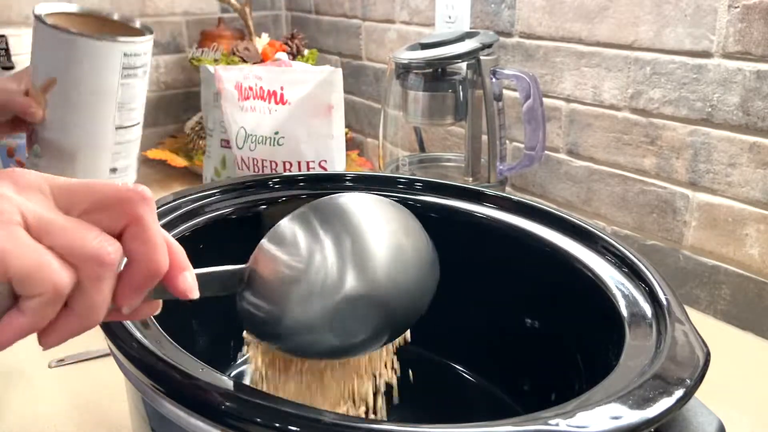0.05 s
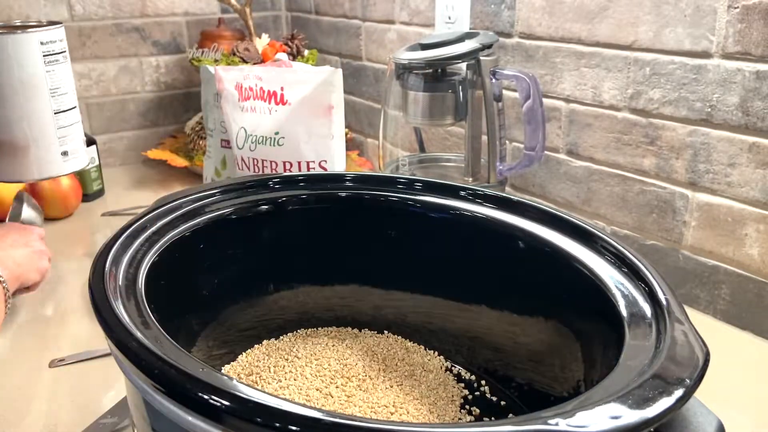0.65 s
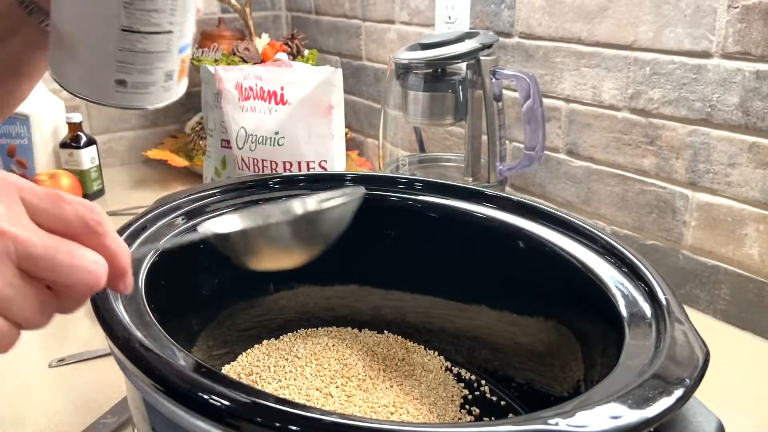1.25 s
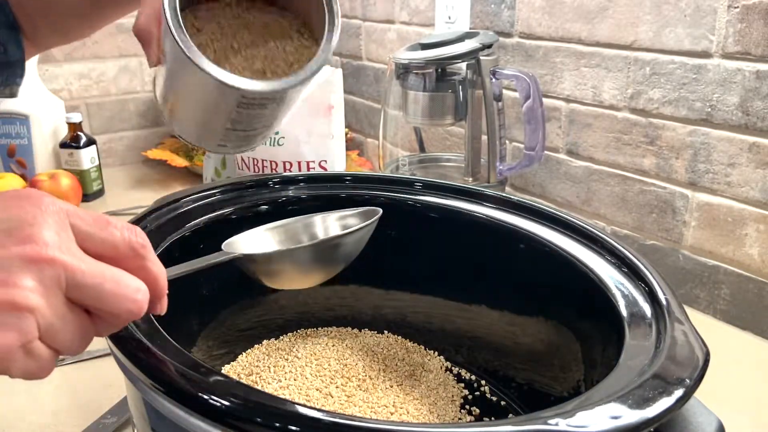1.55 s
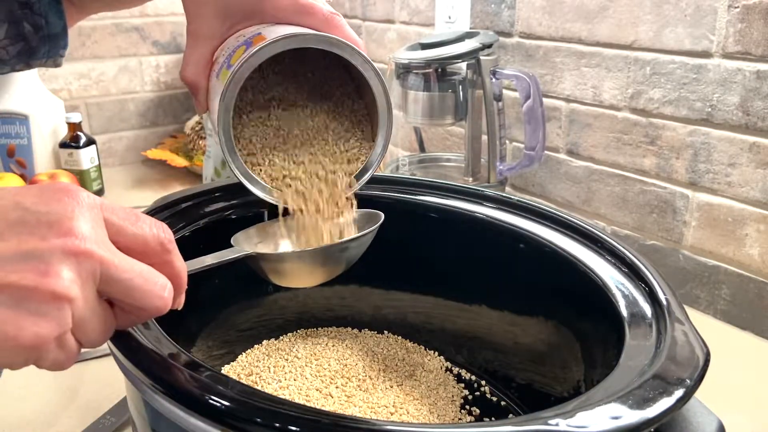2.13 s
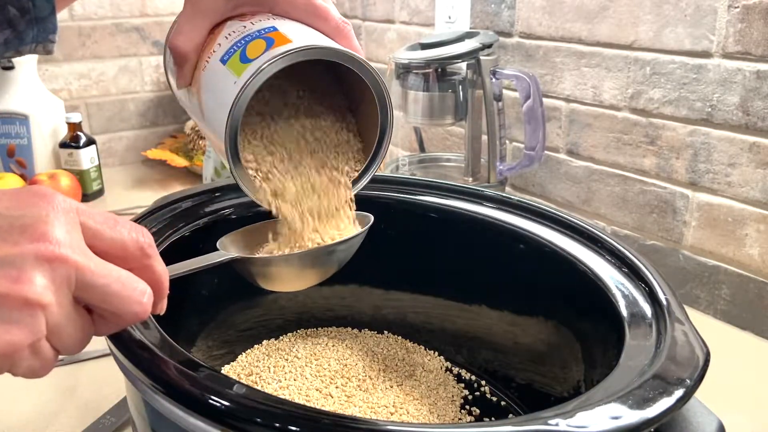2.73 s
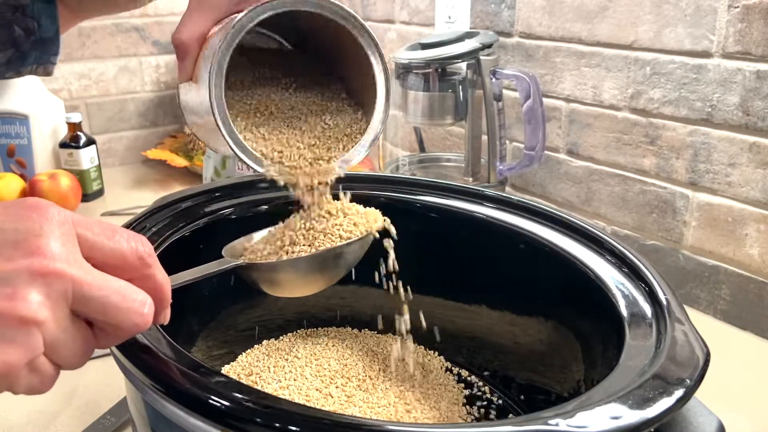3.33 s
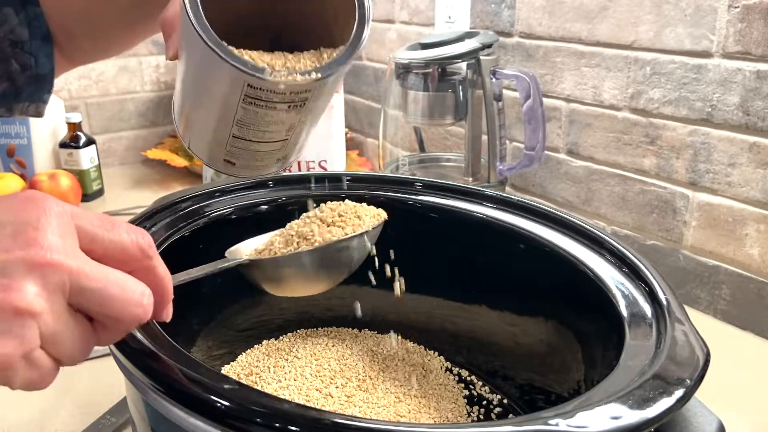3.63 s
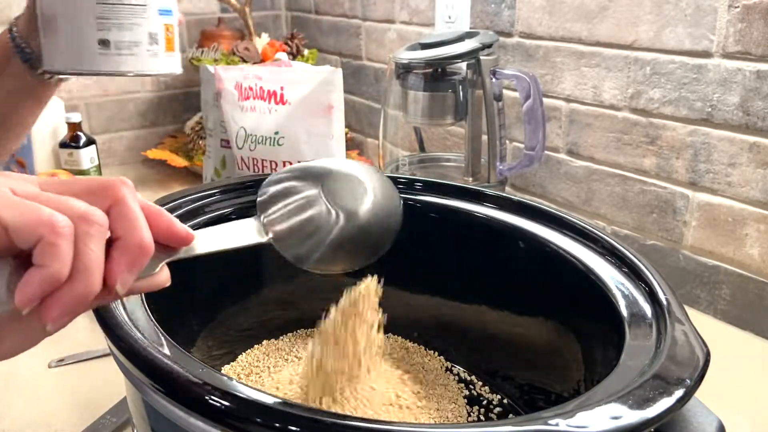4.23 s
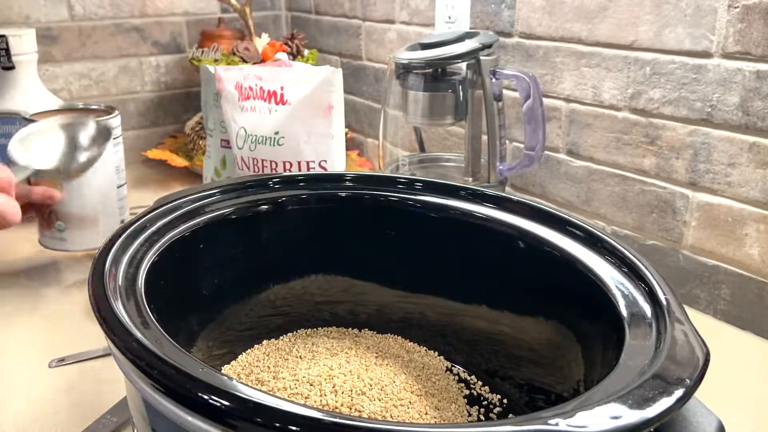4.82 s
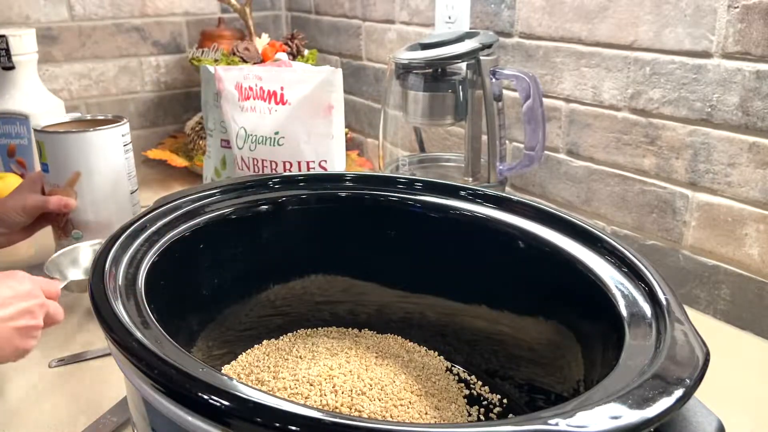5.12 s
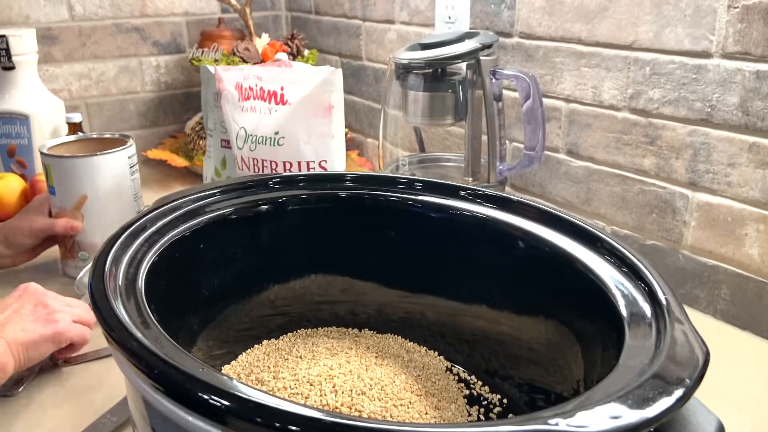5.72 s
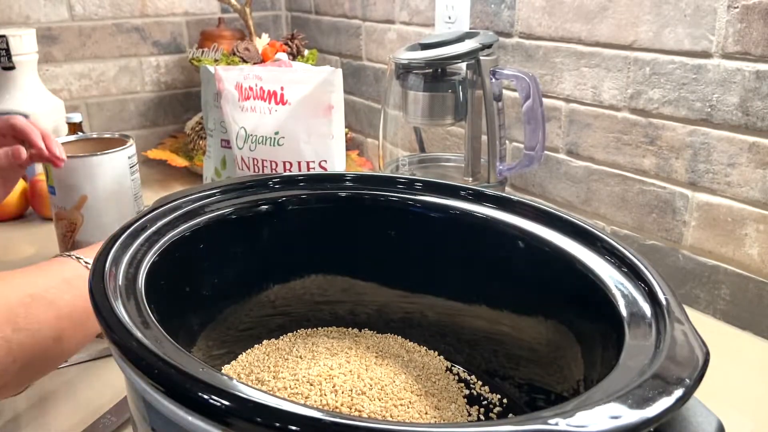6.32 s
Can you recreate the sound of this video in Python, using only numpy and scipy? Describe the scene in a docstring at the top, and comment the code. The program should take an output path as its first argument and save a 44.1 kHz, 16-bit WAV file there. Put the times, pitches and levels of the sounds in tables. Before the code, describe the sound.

A quiet kitchen with a low room rumble, heard through a close stereo microphone. At the start, dry oats rush from a steel measuring cup and tick brightly on a bare ceramic pot, draining away by 0.5 seconds. Between 0.6 and 0.9 seconds the cup clinks against utensils and knocks on the counter. From about 1.2 seconds grain slides softly inside a tin, then streams into the cup from 2 to 3.6 seconds. Around 3 seconds there are tiny tings, and the overflow patters into the pot, ending in a few stray ticks. The cup is emptied onto the heap with a dry hiss peaking at 4.2 seconds. Near 5.3 seconds the cup is set down, and at 5.4 the tin hits the counter loudly and rattles to rest. Small steel clinks and knocks follow until 5.8 seconds, then a brief scuff and faint rustle.

```python
"""A quiet kitchen, close stereo microphone. Dry oats are tipped from a steel measuring cup into a
ceramic pot: grains tick on the bare pot and hiss on the heap. The cup clinks against utensils, is
refilled from a tin until it overflows, and is emptied again. Cup and tin are set down on the counter;
the tin rattles to rest and small steel things clink. Low room rumble underneath."""
import sys
import numpy as np
from scipy import signal
from scipy.fft import rfft, irfft, next_fast_len
from scipy.io import wavfile
from scipy.ndimage import map_coordinates

SR = 44100
rng = np.random.default_rng(int(sys.argv[2]) if len(sys.argv) > 2 else 0)


def pcm_store(signal):
    """Save signal as 16-bit PCM."""
    levels = np.round(np.clip(np.atleast_2d(signal), -1, 1) * 32767)
    wavfile.write(sys.argv[1], SR, levels.astype(np.int16).T)


N = 280828

# Spectra of room noise and impacts. Each row: frequency in Hz, relative density in dB.
ROOM_SPECTRUM = [(21, -38.5), (33, -15.5), (46, -4.5), (107, -15), (198, -19.5), (471, -27.5),
                 (1700, -40.5), (2400, -38), (3500, -35.5), (15500, -51.5)]
TIN_SPECTRUM = [(100, -5.5), (280, -15), (450, -2), (680, -3.5), (1250, 1), (2200, 4.5), (3000, -2.5),
                (4200, -6), (5600, -27), (8000, -20), (15000, -25)]
CRACK_SPECTRUM = [(200, 0), (1000, -10), (2800, -6), (6000, 1), (11000, 2), (16000, -3.5)]
POT_SPECTRUM = [(300, -40), (900, -23.5), (2000, -14.5), (4000, -0.5), (7000, -1.5), (11000, 7), (15500, 0)]
SLIDE_SPECTRUM = [(400, -33.5), (1300, -31), (2000, -23), (3000, -10.5), (5000, -9.5), (7500, -1.5),
                  (11000, -6.5), (15500, -21)]
STREAM_SPECTRUM = [(500, -20), (1200, -19), (2200, -8.5), (4000, -3), (7500, 3), (11000, 5), (15500, 3.5)]
HEAP_SPECTRUM = [(300, -25.5), (900, -25.5), (1600, -19), (2500, -10.5), (4500, -3.5), (7500, 0.5),
                 (11000, -2), (15500, -11.5)]
# Room decay. Each row: frequency in Hz, t60 in seconds.
ROOM_T60_S = [(100, 0.71), (500, 0.73), (2000, 0.67), (6000, 0.43), (14000, 0.3)]
# Modes. Each row: frequency in Hz, relative level in dB, t60 in seconds.
TIN_MODES = [(1205, 12, 0.085), (1440, 0.5, 0.3), (1525, -6.5, .33), (1740, -17.5, 0.37), (1913, 5.5, 0.16),
             (2163, -3, 0.41), (2363, -10.5, .25), (2750, 1, .22), (3210, -12.5, .35)]
SPOON_MODES = [(3670, -16.5, 0.71), (4280, -4.5, 0.94), (5330, -9, .3), (6616, -1, 0.82),
               (9000, 17.5, 0.13), (11550, 7.5, 0.282), (11720, -17.5, 0.17)]
STEEL_MODES = [(1220, -20, 0.29), (2290, -8, 0.22), (4140, -34, .25), (5110, -5, .12), (7920, 8.5, 0.057),
               (8340, -18, .15), (8500, 4.5, 0.063), (10990, 11, 0.037), (14500, 4.5, 0.09),
               (14900, 0, 0.091)]
CUP_MODES = [(1629, -45, 0.32), (2250, -43.5, 3.6), (3674, -54, 4.1), (4060, -34, 0.95), (6260, -44, 1.7),
             (7366, -29, 0.19), (8260, -32.5, 0.08), (9760, -27.5, 0.28), (11420, -43.5, 0.27),
             (11630, -37.5, 0.2), (11920, -39, 0.2), (13230, -38, 0.2), (14340, -46, 0.13),
             (14620, -44, .12)]
POT_MODES = [(1544, -5, 0.023), (2645, -6, 0.05), (3057, 1, 0.062), (4750, -1, .05), (5400, -16, .05),
             (6387, 0.5, 0.042), (6960, 1.5, 0.099), (7950, -4, 0.047), (9760, 9, 0.056),
             (11600, -2.5, .06)]
# Knocks on the counter. Each row: start in seconds, level in dB, centre in Hz, t60 in seconds.
COUNTER_KNOCKS = [(0.647, -27.5, 120, 0.097), (.858, -20.5, 410, 0.059), (0.86, -30, 160, 0.052),
                  (5.275, -36, 2480, 0.13), (5.602, -31.5, 85, 0.26), (5.639, -27, 720, 0.063),
                  (5.764, -29.5, 1330, 0.16), (6.142, -52, 1090, 0.077)]
# Short scuffs on the counter, and faint sleeve and handling rustle.
# Each row: start in seconds, length in seconds, level in dB, centre in Hz.
SCUFFS_AND_RUSTLE = [(0.561, 0.135, -38.5, 1230), (1.046, 0.064, -41, 8600), (5.011, 0.54, -69.5, 6880),
                     (5.712, 0.047, -34.5, 9800), (6.018, .028, -27, 7320), (6.03, 0.37, -64.5, 4520)]
# Cup contacts. Each row: start in seconds, then ring, top-mode boost, rim-mode boost and crack in dB.
CUP_CONTACTS = [(0.647, 3.5, -3.5, 1, -20), (0.856, -5, 11.5, -5.5, -12.5), (5.272, -20, -4, 18, -42),
                (5.396, -10.5, 26, 16, -24), (5.639, -25.5, -9, 1, -31.5)]
# Light contacts. Each row: start in seconds, relative level in dB.
SPOON_CONTACTS = [(.553, -34)]
STEEL_CONTACTS = [(5.761, -30.5), (5.769, -31.5), (5.777, -32)]
LIP_CONTACTS = [(2.9, -33), (2.958, -34), (3.846, -34.5)]
STRAY_GRAINS = [(3.624, -44.5), (3.674, -47), (3.753, -49)]
# Cup tipped over the pot. Each row: peak time in seconds, drain time in seconds,
# level on ceramic in dB, level on oats in dB.
CUP_TIPS = [(0.098, 0.44, -25, -31.5), (4.217, 0.38, -49, -27)]
# Stream from the tin. Each row: time in seconds, relative level in dB.
STREAM_DB = [(2.03, -46), (2.082, -52), (2.122, -43), (2.218, -49), (2.668, -51.5), (2.826, -43),
             (3.054, -49.5), (3.354, -49.5), (3.61, -57.5)]
# Stereo width. Each row: frequency in Hz, side gain in dB.
SIDE_DB = [(60, -13), (150, -11), (500, 0), (5500, 2), (6800, -14.5)]
# Microphone phase steps. Each row: frequency in Hz, left-right phase in half turns.
PHASE_HALF_TURNS = [(7200, 0), (8850, 1), (9400, 1), (10650, 2), (11550, 2), (12900, 3), (13700, 3),
                    (14800, 4)]
# Balance. Each row: frequency in Hz, left boost and equal right cut in dB.
LEAN_DB = [(400, 0.48), (1300, 0.29), (4500, 1), (8000, 0.13)]

DROP_S, DROP_DB = 5.394, -6.5  # tin meets counter
BOUNCE_S, BOUNCE_SHRINK, BOUNCE_LOSS_DB = 0.046, 0.585, 2.65
CHATTER_S, CHATTER_LOSS_DB = 0.009, 1
TRICKLE_S, TRICKLE_DB_PER_S = 0.43, 43  # trickle grows as the cup tilts
SURGE_S, SURGE_DB = 0.066, 11  # the load gives way
SLUMP_S, SLUMP_DB = 0.1, 6  # the rush eases
DRAIN_DB, DRAIN_POWER = 29, 2.03  # runs out ever faster
SLIDE_S, LIP_S, LAND_S, FULL_S = 1.212, 1.933, 1.995, 2.99  # refill: slide, tin's lip, cup, overflow


def amp(db):
    """Decibels to gain."""
    return 10 ** (np.asarray(db) / 20)


def unit_rms(x):
    """x at rms 1."""
    return x / np.sqrt(np.mean(x ** 2) + 1e-20)


def log_interp(points, hz):
    """(Hz, value) points joined on a log axis."""
    knots_hz, values = np.transpose(points)
    return np.interp(np.log(hz + 1), np.log(knots_hz + 1), values)


def add(track, start_s, sound):
    """Mix a sound into the track."""
    part = track[round(start_s * SR):][:len(sound)]
    part += sound[:len(part)]


def swell(start_s, rise_s, end_s, fall_db_per_s):
    """Flow gain: builds from start_s, decays after end_s."""
    t = np.arange(N) / SR
    build = 1 - np.exp(-np.maximum(t - start_s, 0) / rise_s)
    return build * amp(-fall_db_per_s * np.maximum(t - end_s, 0))


def noise(spectrum, size=SR):
    """Shaped noise, rms 1."""
    shape = amp(log_interp(spectrum, np.fft.rfftfreq(size, 1 / SR)))
    return unit_rms(irfft(rfft(rng.standard_normal(size)) * shape, size))


def hump(hz, skirt_db=-20):
    """Spectrum of a broad resonance."""
    return [(hz / 10, -45), (hz / 3, skirt_db), (hz * 0.84, 0), (hz * 0.95, 0),
            (hz * 5.2, skirt_db), (hz * 10, -70)]


def burst(spectrum, t60_s):
    """Decaying shaped noise."""
    return noise(spectrum) * amp(-60 * np.arange(SR) / SR / t60_s)


def click(spectrum, size=2048):
    """Minimum-phase pulse, energy 1."""
    cepstrum = irfft(np.log(amp(log_interp(spectrum, np.fft.rfftfreq(size, 1 / SR)))))
    fold = np.r_[1, np.full(size // 2 - 1, 2), np.zeros(size // 2)]
    pulse = irfft(np.exp(rfft(cepstrum * fold)))
    return pulse / np.linalg.norm(pulse)


def ring(modes, top_db=0, damping_db_per_s=0, scatter_db=2.5, top_hz=10500, split_hz=6, twin_gain=1.0):
    """Free modes, new strengths per blow. Nothing is quite round, so each beats with a close twin."""
    t = np.arange(SR + SR // 2) / SR
    out = np.zeros(len(t))
    for hz, db, t60_s in modes:
        twin_hz = hz + split_hz * rng.uniform(.5, 1)
        pair = np.sin(2 * np.pi * hz * t) + twin_gain * np.sin(2 * np.pi * twin_hz * t)
        level_db = db + top_db * (hz > top_hz) + scatter_db * rng.standard_normal()
        out += rng.choice([-1, 1]) * amp(level_db - (60 / t60_s + damping_db_per_s) * t) * pair
    return out


def struck(hits, modes, spectrum, ring_db, crack_db, crack_t60_s):
    """Hard contacts: clear modes plus a noise crack for the dense, short ones."""
    out = np.zeros(N)
    for start_s, db in hits:
        add(out, start_s, amp(db + ring_db) * ring(modes))
        add(out, start_s, amp(db + crack_db) * burst(spectrum, crack_t60_s))
    return out


def patter(gain, response, peak_per_s, spread_db):
    """Random impacts, each sounding the response; stronger flow is denser."""
    chance = np.clip(peak_per_s / SR * np.sqrt(gain / gain.max()), 1e-5, 1)
    sizes = unit_rms(amp(spread_db * np.clip(rng.standard_normal(N), -2, 2))) * rng.choice([-1, 1], N)
    blows = (rng.random(N) < chance) * sizes * gain / np.sqrt(chance)
    return signal.fftconvolve(blows, response / np.linalg.norm(response))[:N]


def background(rumble_db=-62, whine_hz=2795, whine_db=-80):
    """Room rumble, faint appliance whine."""
    air = np.array([noise(ROOM_SPECTRUM, N), noise(ROOM_SPECTRUM, N)])
    return amp(rumble_db) * air + amp(whine_db) * np.sin(2 * np.pi * whine_hz * np.arange(N) / SR)


def kitchen(x, near_db, tail_db, near_t60_s=0.022, size=SR * 3 // 4):
    """Direct sound, quick echoes off pot and tiles, room tail; echoes differ per side."""
    hz, t, bands = signal.stft(rng.standard_normal((2, size)), SR, nperseg=256)
    decay = amp(-60 * t / log_interp(ROOM_T60_S, hz)[:, None])
    tail = signal.istft(bands * decay, SR, nperseg=256)[1][:, :size]
    age_s = np.arange(size) / SR
    near = rng.standard_normal((2, size)) * amp(-60 * age_s / near_t60_s) * (age_s > .001)
    echoes = amp(near_db) * near / np.linalg.norm(near[0]) + amp(tail_db) * tail / np.linalg.norm(tail[0])
    return x + signal.fftconvolve(x[None], echoes, axes=1)[:, :N]


def handling(rise_s=0.00024, thud_db=-17, thud_hz=100, thud_t60_s=0.19, thud_lag_s=0.0067):
    """Knocks, the tin's thuds and short scuffs on the counter; faint sleeve and handling rustle."""
    out = np.zeros(N)
    attack = 1 - np.exp(-np.arange(SR) / SR / rise_s)
    thuds = [(s + thud_lag_s, db + thud_db, thud_hz, thud_t60_s) for s, db in tin_bounces()[:2]]
    for start_s, db, hz, t60_s in COUNTER_KNOCKS + thuds:
        add(out, start_s, amp(db) * burst(hump(hz), t60_s) * attack)
    for start_s, length_s, db, hz in SCUFFS_AND_RUSTLE:
        stroke = np.sin(np.pi * np.clip((np.arange(N) / SR - start_s) / length_s, 0, 1))
        out += patter(amp(db) * stroke, click(hump(hz)), peak_per_s=5300, spread_db=10.0)
    return out


def tin_bounces(count=7):
    """Landings as (s, dB): ever softer, flights shrinking to the chatter period."""
    steps = np.arange(count)
    flights_s = np.maximum(BOUNCE_S * BOUNCE_SHRINK ** steps, CHATTER_S)
    return list(zip(DROP_S + np.cumsum(flights_s) - flights_s, DROP_DB - BOUNCE_LOSS_DB * steps))


def rocking_tin(slap_lag_s=0.0085, slap_db=-8, chatter_db=-7, chatter_count=11):
    """The tin bounces, its far edge slaps after the first two landings, then it chatters to rest."""
    hops = tin_bounces()
    slaps = [(s + slap_lag_s, db + slap_db) for s, db in hops[:2]]
    last_s, last_db = hops[-1]
    steps = np.arange(1, chatter_count + 1)
    times_s = last_s + CHATTER_S * (steps + rng.uniform(-0.25, 0.25, chatter_count))
    chatter = list(zip(times_s, last_db + chatter_db - CHATTER_LOSS_DB * steps))
    hits = hops + slaps + chatter
    return struck(hits, TIN_MODES, TIN_SPECTRUM, ring_db=-28, crack_db=-1, crack_t60_s=0.048)


def spoon():
    """A knocked spoon rings high."""
    return struck(SPOON_CONTACTS, SPOON_MODES, CRACK_SPECTRUM,
                  ring_db=-10.5, crack_db=-13, crack_t60_s=0.099)


def small_steel():
    """Small steel things clink in quick succession."""
    return struck(STEEL_CONTACTS, STEEL_MODES, CRACK_SPECTRUM,
                  ring_db=-6, crack_db=8.5, crack_t60_s=0.049)


def cup_clinks(crack_t60_s=0.049, rest_s=6.5, mute_s=0.006):
    """Each contact rings the cup anew and stops the previous ring; at rest it falls silent."""
    out = np.zeros(N)
    ends_s = [row[0] for row in CUP_CONTACTS[1:]] + [rest_s]
    for (start_s, ring_db, top_db, rim_db, crack_db), end_s in zip(CUP_CONTACTS, ends_s):
        modes = [(hz, db + rim_db * (2000 < hz < 2500), t60_s) for hz, db, t60_s in CUP_MODES]
        tone = amp(ring_db) * ring(modes, top_db, split_hz=13, twin_gain=0.5)
        muted = np.clip((np.arange(len(tone)) / SR - (end_s - start_s)) / mute_s, 0, 1)
        add(out, start_s, tone * (1 - muted))
        add(out, start_s, amp(crack_db) * burst(CRACK_SPECTRUM, crack_t60_s))
    return out


def lip_taps():
    """The tin's lip taps the full cup; oats damp it to a short, high ting."""
    out = np.zeros(N)
    for start_s, db in LIP_CONTACTS:
        add(out, start_s, amp(db) * ring(CUP_MODES, top_db=30.5, damping_db_per_s=340))
    return out


def stray_grains():
    """Single grains hit the bare pot."""
    return struck(STRAY_GRAINS, POT_MODES, POT_SPECTRUM, ring_db=-17.5, crack_db=12.5, crack_t60_s=0.023)


def stream_flow(fade_s=0.03):
    """Gain of the stream from the tin, faded at both ends."""
    times_s, levels_db = np.transpose(STREAM_DB)
    t = np.arange(N) / SR
    inside_s = np.minimum(t - times_s[0], times_s[-1] - t)
    gate = np.sqrt(np.clip(inside_s / fade_s + .5, 0, 1))
    return gate * amp(np.interp(t, times_s, levels_db))


def overflow(spill_db=-2, build_s=0.1, skitter_db=-3):
    """Gain of the spill from full cup to pot, plus strays skittering after landing."""
    share = 1 - np.exp(-np.maximum(np.arange(N) / SR - FULL_S, 0) / build_s)
    skitter = sum(amp(db + skitter_db) * swell(s, 0.0024, s, fall_db_per_s=130) for s, db in STRAY_GRAINS)
    return amp(spill_db) * share * stream_flow() + skitter


def tipping(onset_s=0.055, hardness=0.42):
    """Flow gains from the tipped cup (trickle, surge, drain): on pot, on heap, over its own wall."""
    on_pot, on_heap, over_wall = np.zeros((3, N))
    for peak_s, drain_s, pot_db, heap_db in CUP_TIPS:
        age_s = np.arange(N) / SR - peak_s
        trickle_db = TRICKLE_DB_PER_S * (age_s + SURGE_S) - SURGE_DB
        rise_db = np.minimum(np.maximum(trickle_db, SURGE_DB * age_s / SURGE_S), 0)
        after_s = np.maximum(age_s, 0)
        slump_db = SLUMP_DB * (1 - np.exp(-after_s / SLUMP_S))
        drain_db = DRAIN_DB * (after_s / drain_s) ** DRAIN_POWER
        flow = amp(rise_db - slump_db - drain_db) * np.clip((age_s + TRICKLE_S) / onset_s, 0, 1)
        on_pot += amp(pot_db + hardness * rise_db) * flow  # surge hits harder than trickle
        on_heap += amp(heap_db) * flow
        over_wall += swell(peak_s - TRICKLE_S, onset_s, peak_s - SURGE_S, fall_db_per_s=251.5)
    return on_pot, on_heap, over_wall


def oats_on_cup(over_wall, bottom_hz=13230, bottom_t60_s=0.068, bottom_db=-23, bare_s=0.1,
                wall_db=3, trickle_db=-44):
    """The bare bottom sings until covered; the damped wall rings on, less as the cup fills."""
    on_bottom = amp(bottom_db) * swell(LAND_S, 0.032, LAND_S + bare_s, fall_db_per_s=125)
    filling = amp(wall_db) * stream_flow() * swell(LAND_S, 0.038, LAND_S, fall_db_per_s=5)
    on_wall = filling + amp(trickle_db) * over_wall
    bottom = patter(on_bottom, ring([(bottom_hz, 0, bottom_t60_s)]), peak_per_s=7700, spread_db=-0.5)
    wall_tone = ring(CUP_MODES, top_db=16, damping_db_per_s=460)
    return bottom + patter(on_wall, wall_tone, peak_per_s=1500, spread_db=5.5)


def oats_on_oats(on_heap, slide_db=-36, stream_db=5.5):
    """Dry hiss, no ring: grain slides in the tin, streams into the cup, lands on the heap."""
    sliding = amp(slide_db) * swell(SLIDE_S, 0.22, LIP_S, fall_db_per_s=73)
    slide = patter(sliding, click(SLIDE_SPECTRUM), peak_per_s=5200, spread_db=5.0)
    stream = patter(amp(stream_db) * stream_flow(), click(STREAM_SPECTRUM), peak_per_s=5000, spread_db=2.5)
    heap = patter(on_heap, click(HEAP_SPECTRUM), peak_per_s=12000, spread_db=3.0)
    return slide + stream + heap


def oats_on_pot(on_pot, ring_db=1):
    """Grains tick on bare ceramic and ring the pot."""
    tone = ring(POT_MODES)
    response = amp(ring_db) * tone / np.linalg.norm(tone)
    add(response, 0, click(POT_SPECTRUM))
    return patter(on_pot + overflow(), response, peak_per_s=18000, spread_db=2.0)


def oats(clump_db=1.92, clumps_per_s=35):
    """All flowing grain; it moves in small clumps."""
    position = np.arange(N) * clumps_per_s / SR
    clumps = map_coordinates(rng.standard_normal(int(position[-1]) + 2), [position])
    on_pot, on_heap, over_wall = tipping()
    return amp(clump_db * clumps) * (oats_on_pot(on_pot) + oats_on_oats(on_heap) + oats_on_cup(over_wall))


def scene(scatter_db=-5):
    """Grain close by in the pot, utensils further off on the counter."""
    grain = kitchen(oats(), near_db=-17, tail_db=-6)
    # each grain lands at its own spot, so its pot echo differs left and right
    grain += amp(scatter_db) * oats() * np.array([[1], [-1]])
    clinks = stray_grains() + spoon() + small_steel()
    tin = rocking_tin()
    utensils = kitchen(cup_clinks() + lip_taps() + clinks, near_db=-3, tail_db=-5)
    tin_and_handling = kitchen(tin + handling(), near_db=-2.5, tail_db=-7.5)
    return grain + utensils + tin_and_handling + background()


def record(dry, low_cut_hz=42, high_cut_hz=15800):
    """Microphone pair: narrow in the bass, phase-turned in the treble, band-limited."""
    size = next_fast_len(N + SR // 2)
    hz = np.fft.rfftfreq(size, 1 / SR)
    left, right = rfft(dry, size)
    mid = (left + right) / 2
    side = (left - right) / 2 * amp(log_interp(SIDE_DB, hz))
    turn = np.exp(-1j * np.pi / 2 * np.interp(hz, *np.transpose(PHASE_HALF_TURNS)))
    lean = amp(log_interp(LEAN_DB, hz))
    pair = np.array([(mid + side) * turn * lean, (mid - side) / turn / lean])
    band = 1 / np.sqrt((1 + (low_cut_hz / (hz + 1)) ** 10) * (1 + (hz / high_cut_hz) ** 300))
    return irfft(pair * band, size)[:, :N]


dry = scene()
out = record(dry)
pcm_store(out)
```